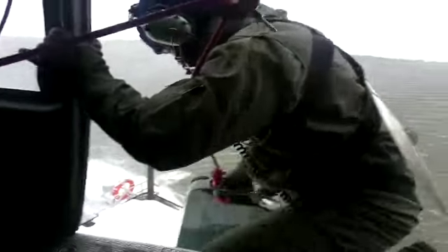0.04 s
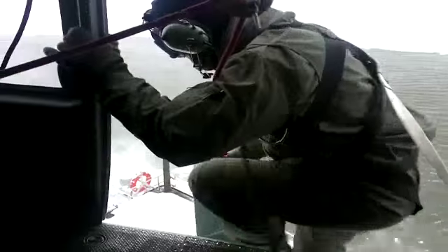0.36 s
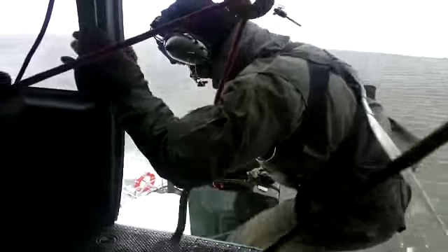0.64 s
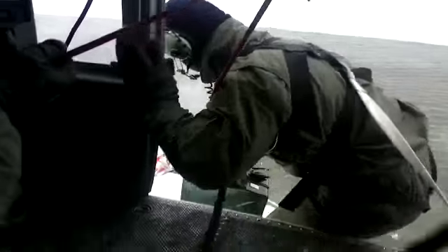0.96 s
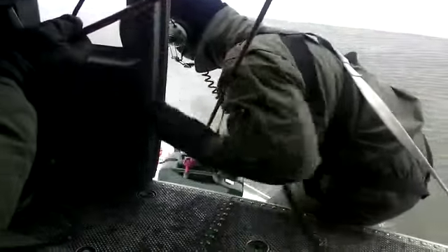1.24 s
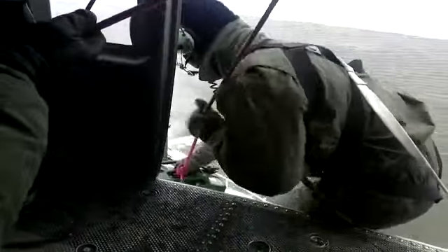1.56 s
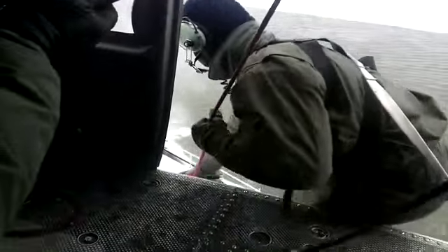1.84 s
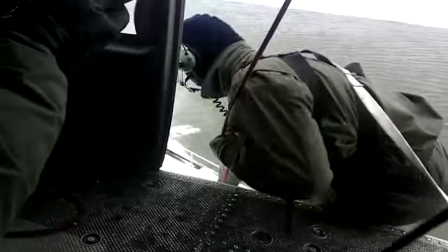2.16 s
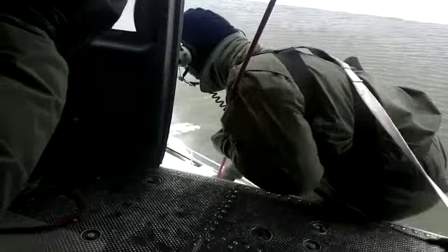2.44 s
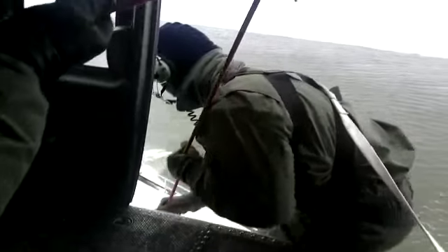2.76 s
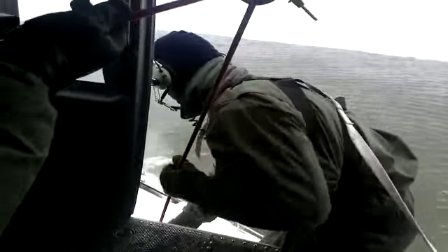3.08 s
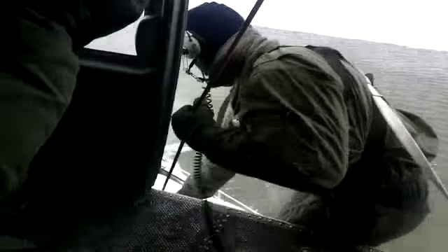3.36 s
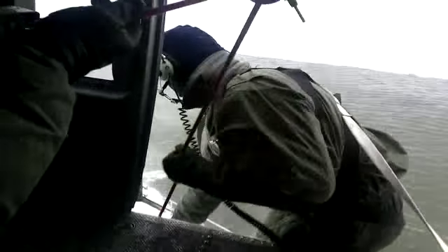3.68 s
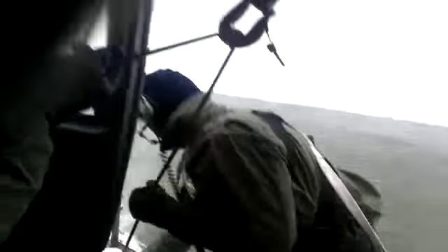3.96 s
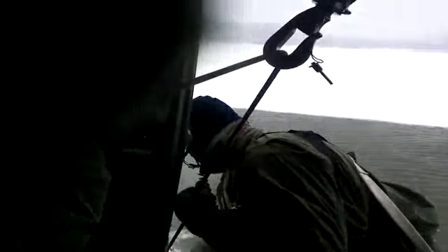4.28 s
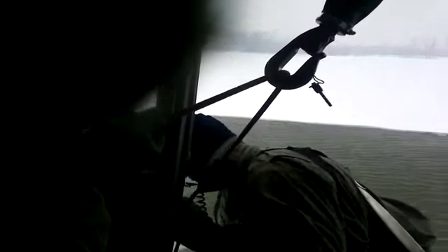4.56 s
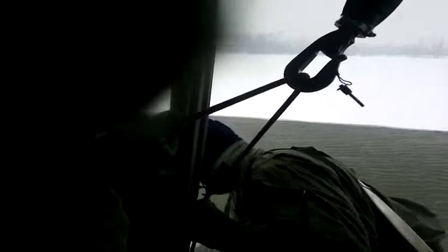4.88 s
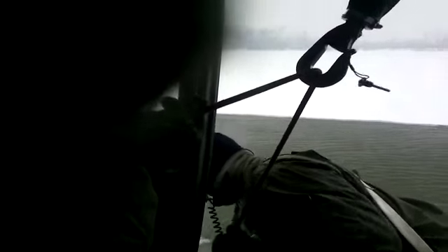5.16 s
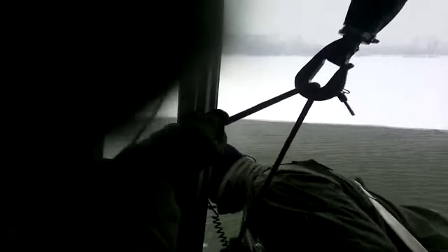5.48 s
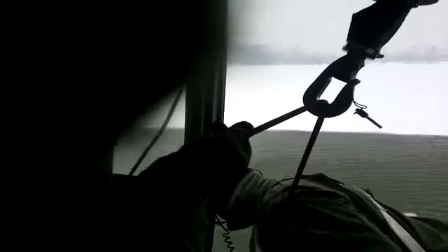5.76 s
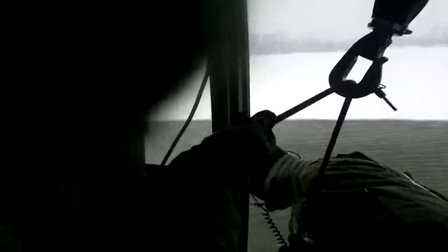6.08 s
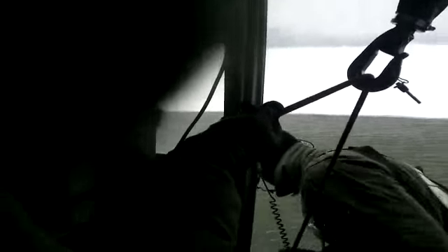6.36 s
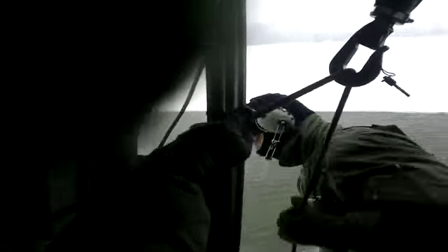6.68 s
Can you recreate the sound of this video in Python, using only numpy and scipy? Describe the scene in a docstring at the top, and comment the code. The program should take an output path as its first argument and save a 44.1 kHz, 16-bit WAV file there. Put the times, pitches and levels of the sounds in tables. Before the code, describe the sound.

A helicopter's rotors and turbine drone loudly inside the cabin, door open, with a low hum, throbbing wind and a thin whine.

```python
"""Hovering helicopter, door open

Inside a two-blade helicopter the governor hunts slowly, so every pitch sways. The tail rotor hum beats
against a drive tone, and downwash roars in with a thud and a swish for each blade. Gear tones swell and
fade, the pinion whines and the compressor whistles. Midway a body moves in front of the microphone and
shades the treble; gain control ducks the roar on every beat of the hum."""
import sys
import numpy as np
from scipy import signal
from scipy.fft import rfft, irfft
from scipy.io import wavfile

SR = 44100
rng = np.random.default_rng(int(sys.argv[2]) if len(sys.argv) > 2 else 0)


def log_audio(samples):
    """Write samples as a 16-bit WAV file to the path given in sys.argv[1]."""
    # one column per channel
    frames = np.atleast_2d(samples).T
    # limit to full scale, then quantise
    limited = np.clip(frames, -1, 1)
    pcm = np.round(limited * 32767).astype(np.int16)
    wavfile.write(sys.argv[1], SR, pcm)


N = 300982
T = np.arange(N) / SR
FREQ = np.maximum(np.arange(N // 2 + 1) * SR / N, 1)
BLADE_HZ, TAIL_HZ, PINION_HZ = 10.695, 54.84, 3160.6  # at nominal rotor speed


def undb(db):
    """Decibels to amplitude ratio."""
    return 10 ** (np.asarray(db) / 20)


def curves(table):
    """Linear interpolation of each column of a timed table, sample by sample."""
    times, *columns = np.transpose(table)
    return [np.interp(T, times, column) for column in columns]


def across(points, at=FREQ):
    """Interpolation of a table on a log-frequency axis."""
    hz, value = np.transpose(points)
    return np.interp(np.log(at), np.log(hz), value)


def unit(x):
    """Normalisation to rms 1."""
    return x / np.sqrt(np.mean(x ** 2))


def walk(rate_hz):
    """Low-passed Gaussian noise: smooth random motion of rms 1."""
    lowpass = np.exp(-(np.arange(len(FREQ)) * SR / N / rate_hz) ** 2)
    return unit(irfft(rfft(rng.standard_normal(N)) * lowpass, N))


def scatter(rate_hz, count=1024):
    """Multipath fading: cabin reflections sum to a drifting complex gain of rms 1."""
    hz = (np.arange(count) - count // 2) * SR / N
    lines = (rng.standard_normal(count) + 1j * rng.standard_normal(count)) / (1 + (hz / rate_hz) ** 2)
    gain = np.fft.ifft(np.fft.ifftshift(lines))
    gain /= np.sqrt(np.mean(abs(gain) ** 2))
    return np.interp(np.arange(N) * count / N, np.arange(count), gain)


# Likeness of the two microphone ports. Each row: frequency in Hz, coherence from 0 to 1.
COHERENCE = [(40, .96), (100, .978), (170, .962), (250, .92), (350, .85), (600, .75), (1100, .47),
             (1500, .2), (1900, .38), (2400, .25), (3900, .17), (4800, .06), (6500, .1)]
# Phase between the ports. Each row: frequency in Hz, lead of the left in radians.
PHASE_LEAD = [(30, .13), (110, .08), (240, 0), (500, -.4), (640, -.8), (780, -.35), (1100, -.55),
              (1500, -1.4), (1900, -3.4), (2500, -5.4), (3200, -6.8), (4200, -8.5), (6300, -12.3),
              (8000, -15.7), (10000, -19)]
def ports(hz):
    """Spatial coherence: long waves reach both ports alike but shifted in phase, short ones unrelated."""
    return across(COHERENCE, hz), np.exp(1j * across(PHASE_LEAD, hz) * np.array([[1], [0]]))


def air_noise(spectrum):
    """Partly coherent noise of rms 1: a coloured sum of shared and independent parts."""
    shared, own = rfft(rng.standard_normal(N)), rfft(rng.standard_normal((2, N)))
    alike, shift = ports(FREQ)
    field = np.sqrt(alike) * shared * shift + np.sqrt(1 - alike) * own
    return unit(irfft(field * undb(across(spectrum)), N))


def tone(turns, hz, blur, rate_hz):
    """Superposition of a direct tone and reflections blur times as strong, with rms near 1."""
    alike, shift = ports(hz)
    shared, own = scatter(rate_hz), np.array([scatter(rate_hz), scatter(rate_hz)])
    echo = np.sqrt(alike) * shared + np.sqrt(1 - alike) * own
    wave = np.exp(2j * np.pi * turns) * shift * (1 + blur * echo)
    return wave.real * np.sqrt(2 / (1 + blur ** 2))


# Tail hum. Each row: harmonic number, level in dB, gain at top speed in dB, blur as a ratio.
TAIL_HARMONICS = [(1, -28.5, -0.5, 0.2), (2, -19, 2.5, 0.57), (5, -38, 2, 0.9), (7, -38, 4, 0.6)]
# The third and fourth harmonics swell and fade. Each row: time in seconds, level in dB.
TAIL_THIRD = [(0.0, -25), (.6, -24), (.9, -24), (1.3, -24), (1.7, -28), (2.04, -17.5), (2.3, -23.5),
              (2.8, -34), (3.6, -36), (3.9, -27), (4.3, -24.5), (4.8, -20), (5.3, -19.5), (5.68, -23),
              (6.0, -19.5), (6.45, -24), (6.82, -29)]
TAIL_FOURTH = [(0.0, -21), (0.35, -31.5), (0.72, -22.5), (1.08, -17.5), (1.33, -36), (1.56, -26),
               (1.8, -16.5), (2.1, -25.5), (2.3, -21), (2.54, -24), (2.7, -38.5), (2.94, -20), (3.2, -27.5),
               (3.65, -18), (3.9, -29.5), (4.1, -26), (4.35, -19.5), (4.66, -32), (4.85, -24.5),
               (5.12, -18.5), (5.36, -24.5), (5.68, -27), (6.0, -21), (6.4, -24.5), (6.65, -21),
               (6.82, -23)]
# Times in seconds at which the drive tone and the second harmonic cancel and add up in turn.
BEAT_TIMES = [-.85, -.05, .65, 1.35, 2.02, 2.72, 3.26, 3.78, 4.85, 5.65, 6.32, 6.75, 7.5]
def tail_rotor(clock, sway, drive_db=-16.5):
    """Beating: the second harmonic of the tail rotor interferes with a drive tone just below it."""
    turns = TAIL_HZ * clock + .42  # starts nearly opposed to the thud's fifth harmonic
    hum = sum(undb(db + speed_db * sway) * tone(k * turns, k * TAIL_HZ, blur, rate_hz=3.6)
              for k, db, speed_db, blur in TAIL_HARMONICS)
    overtones = sum(undb(curves(levels)[0]) * tone(k * turns, k * TAIL_HZ, blur=.15, rate_hz=3)
                    for k, levels in ((3, TAIL_THIRD), (4, TAIL_FOURTH)))
    lag = np.interp(T, BEAT_TIMES, np.arange(len(BEAT_TIMES)) / 2)  # one cycle per beat
    drive = undb(drive_db) * tone(2 * turns - lag, 2 * TAIL_HZ, blur=.06, rate_hz=2)
    return hum + overtones - drive


# Blade thud. Each row: harmonic number, level in dB.
THUD_HARMONICS = [(3, -37), (4, -27.5), (5, -31), (6, -49), (7, -26), (8, -33.5), (9, -35)]
# Gusts at the door. Each row: time in seconds, relative strength in dB.
DOOR_GUSTS = [(0, -25.5), (.7, -24.5), (1.0, -15), (1.7, -18.5), (2.9, -22.5), (3.25, -8.5), (3.6, -31.5),
              (4.6, -36), (5.3, -16), (5.8, -22), (6.2, -19), (6.8, -7.5)]
# Their buffeting. Each row: frequency in Hz, relative density in dB.
BUFFET_SPECTRUM = [(6, -52), (18, -34.5), (28, -21), (42, 3), (60, 27.5), (85, 30), (110, 3), (170, -57)]
def main_rotor(clock):
    """Loading noise: blades thud at harmonics of their passing rate, harder as gusts buffet the door."""
    gust_db = curves(DOOR_GUSTS)[0]
    load_db = .18 * (gust_db - gust_db.mean())
    thud = sum(undb(db + load_db) * tone(k * BLADE_HZ * clock, k * BLADE_HZ, blur=.55, rate_hz=1.1)
               for k, db in THUD_HARMONICS)
    buffet = undb(gust_db - 9 + 2.4 * walk(6.6)) * air_noise(BUFFET_SPECTRUM)
    return thud + buffet


def blade_wake(clock):
    """Periodic wakes: each arrives, holds and ebbs, while turbulence varies its timing and strength."""
    angle = 2 * np.pi * (BLADE_HZ * clock + .055 * walk(8))
    pulse = np.tanh(1.5 * np.cos(angle + .3 * np.cos(angle)) + .35)
    return pulse * (1 + .07 * walk(6))


# Downwash rumble. Each row: frequency in Hz, relative density in dB.
WASH_SPECTRUM = [(18, -21), (45, -4.5), (100, -3), (135, -1), (190, -1), (250, -7), (360, -8), (460, -11),
                 (600, -12), (800, -18.5), (1300, -44.5), (3000, -73)]
def downwash(wake, level_db=-16.5, throb_db=.5):
    """Turbulent flow noise: a low rumble that swells between the wakes."""
    return undb(level_db + 1.03 * walk(7.6) - throb_db * wake) * air_noise(WASH_SPECTRUM)


# Harder wakes. Each row: time of the peak in seconds, change of the roar in dB.
WAKE_SLAPS = [(1.03, -0.5), (1.595, 4), (2.25, 2), (2.43, -1), (3.54, 4.5), (4.111, 3), (5.78, 3.5),
              (6.352, 3)]
def wake_slaps(width_s=.021):
    """Transient modulation: wakes slap into the doorway, each a Gaussian pulse of level in dB."""
    return sum(db * np.exp(-((T - peak_s) / width_s) ** 2) for peak_s, db in WAKE_SLAPS)


# Exhaust roar. Each row: frequency in Hz, relative density in dB.
EXHAUST_SPECTRUM = [(250, -15.5), (600, 3), (1000, 7), (1450, 2.5), (1900, 3), (2500, -2), (3200, 1),
                    (3800, -0.5), (4600, -4), (6500, -7.5), (7600, -52.5), (9000, -74), (11000, -43)]
def exhaust(wake, gust, slap_db, shade, level_db=-25.5, shade_db=-3):
    """Jet noise: a broad roar shaken by turbulence and by the wakes."""
    shake_db = 1.5 * gust + .6 * wake + slap_db
    return undb(level_db + shade_db * shade + shake_db) * air_noise(EXHAUST_SPECTRUM)


# Tooth rates of the strong gear meshes, in Hz at nominal speed.
MESH_HZ = [497.3, 641.65, 763.1, 1633.8, 2213.9, 3715.8, 5013]
# One table for each mesh. Each row: time in seconds, level in dB.
MESH_LEVELS = [
    [(0.0, -55), (0.44, -32), (2.36, -34), (3.44, -40), (3.68, -38), (4.82, -29.5), (5.78, -37),
     (6.02, -31), (6.82, -58)],
    [(0.0, -34.5), (0.62, -25), (0.86, -26.5), (1.76, -25.5), (2.8, -29), (3.1, -32.5), (3.3, -29),
     (3.7, -28.5), (4.04, -36), (4.28, -35), (4.88, -28.5), (5.72, -26.5), (6.42, -24.5), (6.82, -26.5)],
    [(0.0, -40.5), (0.98, -31), (1.64, -34), (2.48, -42), (2.72, -35.5), (4.04, -41.5), (5.06, -35),
     (5.72, -40), (6.44, -50), (6.82, -44)],
    [(0.0, -36), (0.86, -41), (2.54, -35), (3.8, -45.5), (4.58, -40), (6.2, -37.5), (6.82, -53)],
    [(0.0, -51), (0.68, -53), (1.16, -42), (2.66, -42.5), (3.08, -46), (6.08, -41.5), (6.82, -45)],
    [(0, -41), (.55, -39.5), (1.1, -57), (1.9, -47), (2.8, -45), (4.25, -42.5), (4.8, -48), (6.8, -50)],
    [(0.0, -51), (0.38, -54), (1.34, -54), (2.48, -49), (3.8, -60), (6.82, -66)],
]
def gear_meshes(clock):
    """Periodic tooth contact: each mesh sounds a tone locked to the rotor speed."""
    return sum(undb(curves(levels)[0]) * tone(hz * clock + rng.random(), hz, blur=.31, rate_hz=17)
               for hz, levels in zip(MESH_HZ, MESH_LEVELS))


# Pinion whine. Each row: time in seconds, left and right levels in dB, lead of the left in radians.
PINION_FIELD = [(0, -43, -41, 1), (.2, -50, -44, 0), (.32, -50, -26.5, .5), (.44, -47, -26.5, 2),
                (.58, -31.5, -25.5, 1.5), (.7, -31, -32, 2.1), (.84, -33.5, -33.5, 1.7), (.9, -39, -35, .8),
                (.97, -35, -34, .8), (1.2, -42, -43, -.8), (1.28, -34, -39, -1.4), (1.35, -44, -38, -1.7),
                (1.47, -30.5, -30, 0), (2.2, -30, -31, -.9), (2.3, -50, -32, -.5), (2.45, -38, -37.5, -1),
                (2.54, -32, -38, -1.1), (2.7, -38, -40, -2.8), (2.87, -35.5, -29, -2.6),
                (3.06, -29.5, -25.5, -1.4), (3.22, -35, -28.5, -2.9), (3.31, -30, -27.5, -1.9),
                (3.4, -30, -29, -3.1), (3.55, -34, -27.3, -2.7), (3.76, -37.5, -36, -1.5),
                (3.88, -37, -42, -2.3), (4.12, -45, -32.5, -.3), (4.52, -48, -44, 0),
                (4.64, -35.5, -37, -.5), (4.84, -37, -37.5, -1.1), (5.03, -48, -48, 0),
                (5.2, -35.5, -47, -.3), (5.56, -32.5, -48, -1.1), (5.68, -37, -44, -2.6),
                (5.84, -40, -38, -1.7), (6.05, -48, -46, -2.4), (6.2, -41, -40, -2.8),
                (6.55, -36.5, -41, -2.4), (6.68, -33.5, -43, 0), (6.82, -31.5, -38, .8)]
def pinion(clock):
    """Standing waves: the input pinion's thin, fluttering whine differs at each port."""
    left_db, right_db, lead = curves(PINION_FIELD)
    flutter = .96 + .4 * np.array([scatter(20), scatter(20)])
    phase = 2 * np.pi * PINION_HZ * clock + np.array([lead, -lead]) / 2
    return np.sqrt(2) * undb([left_db, right_db]) * (flutter * np.exp(1j * phase)).real


# Weaker gear tones. Each row: frequency in Hz at nominal speed, level in dB.
WEAK_GEARS = [(63.2, -26.5), (119.7, -30), (137.4, -30.5), (267.8, -39.5), (364, -38), (994.6, -44.5),
              (1090, -44.5), (1526.2, -66), (1732.1, -57), (1794, -42), (1857.2, -46), (1920.5, -42.5),
              (1981.1, -56), (3652.6, -47.5), (3896.2, -50.5)]
def weak_gears(clock, sway, speed_db=.5):
    """Shaft tones and sidebands: many are spaced by the 63 Hz rotation of the pinion shaft."""
    tones = sum(undb(db) * tone(hz * clock + rng.random(), hz, blur=1, rate_hz=1.94)
                for hz, db in WEAK_GEARS)
    return undb(speed_db * sway) * tones


# Blade hiss. Each row: frequency in Hz, relative density in dB.
SWISH_SPECTRUM = [(1500, -1.5), (3000, -16), (4000, -26.5), (4800, -6), (5700, 3), (6700, 1.5), (7600, 0),
                  (9100, -3), (9700, -11.5), (10200, -14)]
def blade_swish(wake, gust, slap_db, shade, level_db=-33, shade_db=-6, depth_db=7, flutter_db=4):
    """Amplitude modulation: a hiss surges under each passing blade and flutters with the eddies."""
    eddies = np.tanh(walk(50))
    surge = unit(undb(depth_db * wake + 1.4 * gust + flutter_db * eddies + .4 * slap_db))
    return undb(level_db + shade_db * shade) * surge * air_noise(SWISH_SPECTRUM)


# The gas generator sways a quarter cycle ahead of the rotor. Each row: time in seconds, rate in Hz.
SHAFT_SPEED = [(0.0, 547.4), (0.32, 548.9), (0.62, 554.2), (1.28, 569.7), (1.52, 572.8), (2.18, 570.5),
               (2.48, 567.2), (3.74, 548.0), (4.1, 546.0), (4.58, 548.2), (4.82, 551.4), (5.54, 567.8),
               (5.84, 571.8), (6.02, 574.0), (6.32, 574.5), (6.82, 568.0)]
# Turbine tones, the compressor blade tone last. Each row: shaft multiple, relative level in dB.
TURBINE_TONES = [(10, -21), (12, -17.5), (16, -4)]
# A soft whistle just above the pinion. Each row: time in seconds, level in dB.
WHISTLE_LEVELS = [(0, -48), (.9, -49), (1.2, -46), (1.6, -43), (2.5, -39.5), (2.7, -47), (5.2, -55),
                  (5.5, -43), (5.8, -53), (6.82, -46)]
def turbine(shade, level_db=-34.5, shade_db=-7.5, jitter_hz=.7, skirt_hz=240, skirt_db=-1.5):
    """Spectral broadening: amid shaft tones, intake turbulence spreads the blade tone into a hiss."""
    shaft_hz = curves(SHAFT_SPEED)[0] + jitter_hz * walk(13.75)
    turns, hz = np.cumsum(shaft_hz) / SR, np.mean(shaft_hz)
    tones = sum(undb(db) * tone(k * turns, k * hz, blur=1.1, rate_hz=14) for k, db in TURBINE_TONES)
    whistle = undb(curves(WHISTLE_LEVELS)[0]) * tone(6 * turns, 6 * hz, blur=.5, rate_hz=10)
    eddies = unit(irfft(rfft(rng.standard_normal((2, 2, N))) / (1 + (FREQ / skirt_hz) ** 2), N))
    blade_phase = 2 * np.pi * TURBINE_TONES[-1][0] * turns
    skirt = eddies[0] * np.cos(blade_phase) + eddies[1] * np.sin(blade_phase)
    gain = undb(level_db + shade_db * shade + 2 * walk(35) + .87 * walk(4.4))
    return whistle + gain * (tones + undb(skirt_db) * skirt)


# The governor's hunting. Each row: time in seconds, rotor speed as a share of nominal.
ROTOR_SPEED = [(0.0, 0.9978), (0.5, 0.9906), (0.86, 0.9897), (1.04, 0.9912), (2.24, 1.0069), (2.66, 1.0109),
               (3.14, 1.0131), (3.56, 1.0101), (3.8, 1.0071), (4.58, 0.9933), (4.82, 0.9914),
               (5.12, 0.9901), (5.42, 0.9906), (5.66, 0.9926), (6.5, 1.0066), (6.82, 1.0106)]
# Acoustic shadow of a body between door and microphone. Each row: time in seconds, shade from 0 to 1.
BODY_SHADE = [(.7, 0.27), (1.7, 0.3), (2.3, 0.02), (2.8, 0.37), (3.2, 0.32), (3.5, 0.4), (3.75, 0.35),
              (4.3, 1), (4.8, 0.72), (5.6, 1), (6.3, 0.87), (6.8, 0.85)]
def scene():
    """Superposition: all sources add, and those geared to the rotor share one clock."""
    speed, shade = curves(ROTOR_SPEED)[0], curves(BODY_SHADE)[0]
    clock = np.cumsum(speed) / SR
    sway = 2 * (speed - speed.min()) / np.ptp(speed) - 1  # -1 at the slowest, 1 at the fastest
    engine = turbine(shade)
    rotors = main_rotor(clock) + tail_rotor(clock, sway)
    gearbox = gear_meshes(clock) + pinion(clock) + weak_gears(clock, sway)
    wake, gust, slap_db = blade_wake(clock), np.tanh(walk(24)), wake_slaps()
    roar = downwash(wake) + exhaust(wake, gust, slap_db, shade)
    return rotors + roar + gearbox + blade_swish(wake, gust, slap_db, shade) + engine


def gain_control(x, hold_db=-12, ratio=2.56, react_s=.12):
    """Compression: gain falls as the running level rises above the held level, and rises below it."""
    step = 1 / (react_s * SR)
    excess = np.mean(x ** 2, axis=0) / undb(hold_db) ** 2 - 1
    level = np.sqrt(1 + signal.lfilter([step], [1, step - 1], excess))
    return x * level ** (1 / ratio - 1)


# Colour of the ports. Each row: frequency in Hz, left minus right level in dB.
PORT_BALANCE = [(60, .1), (110, 1), (340, .5), (620, -.6), (800, -2.6), (1050, -3), (1900, -2),
                (3200, -1.5), (4000, .5), (5000, 3.5), (6000, 3), (7200, 0), (9000, -4.6)]
def record(dry, ceiling=.96, top_hz=10300):
    """Filtering and saturation: ports colour the sound, gain rides it, peaks round off, the top is cut."""
    colour = undb(across(PORT_BALANCE) * np.array([[.5], [-.5]]))
    levelled = gain_control(irfft(rfft(dry) * colour, N))
    rounded = levelled / (1 + (levelled / ceiling) ** 6) ** (1 / 6)
    return signal.sosfilt(signal.ellip(10, .2, 80, top_hz, fs=SR, output="sos"), rounded)


dry = scene()
out = record(dry)
log_audio(out)
```